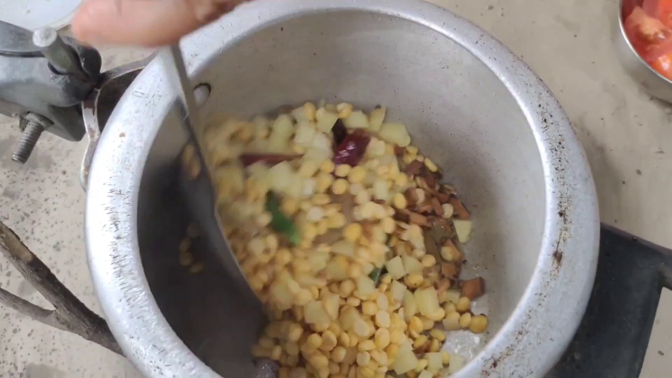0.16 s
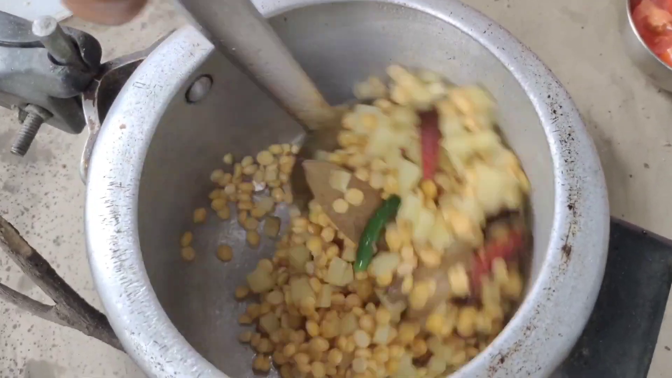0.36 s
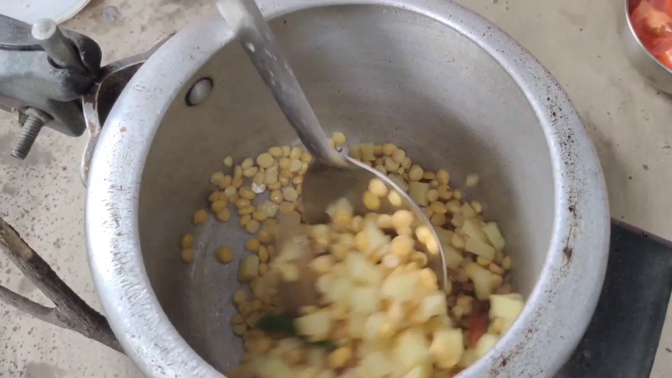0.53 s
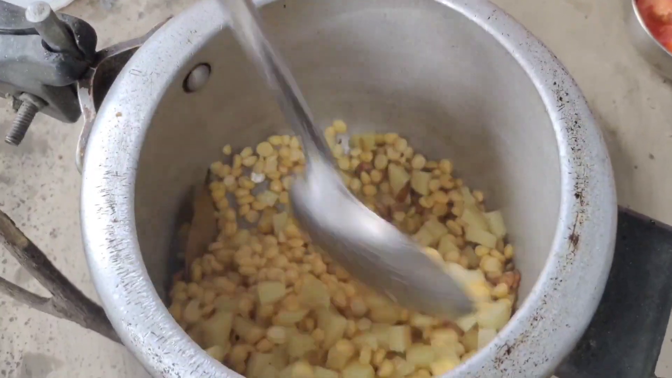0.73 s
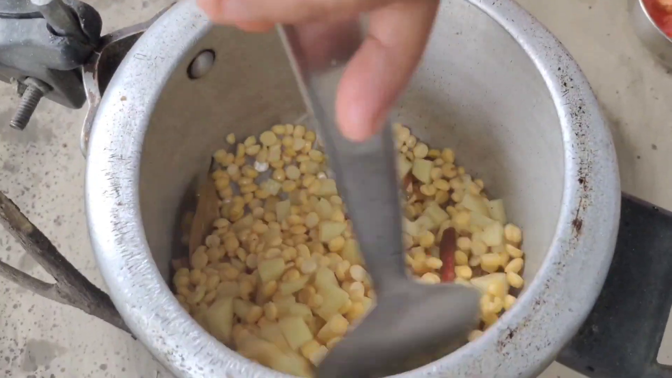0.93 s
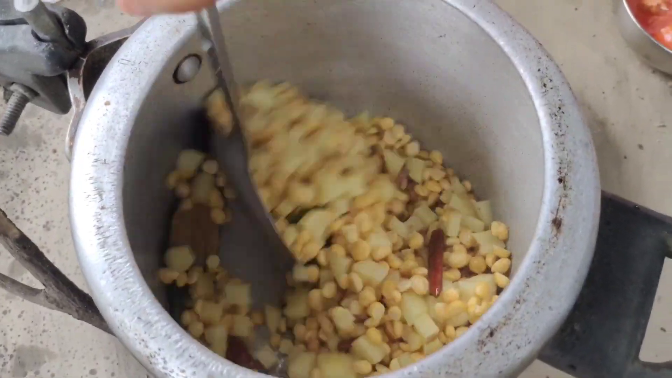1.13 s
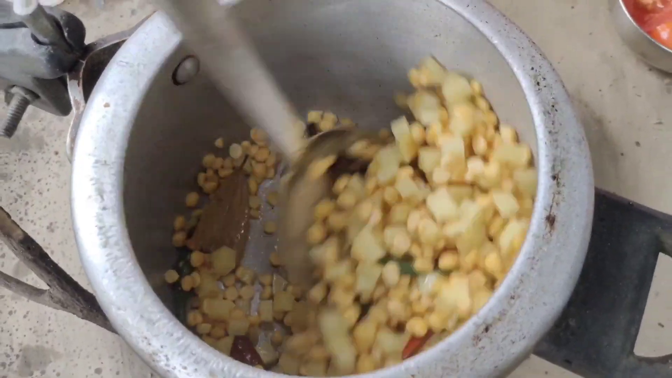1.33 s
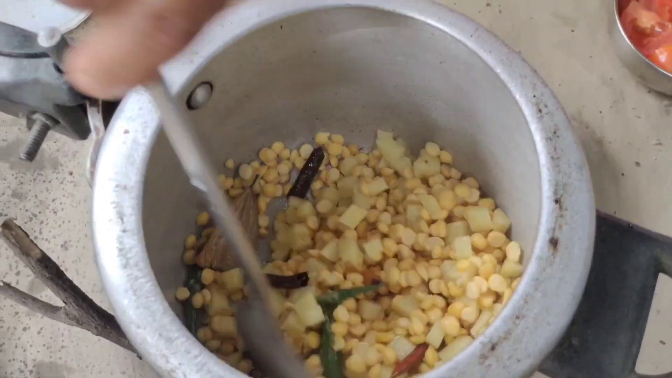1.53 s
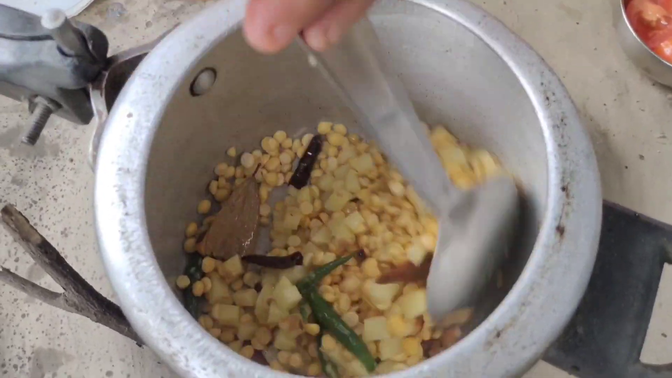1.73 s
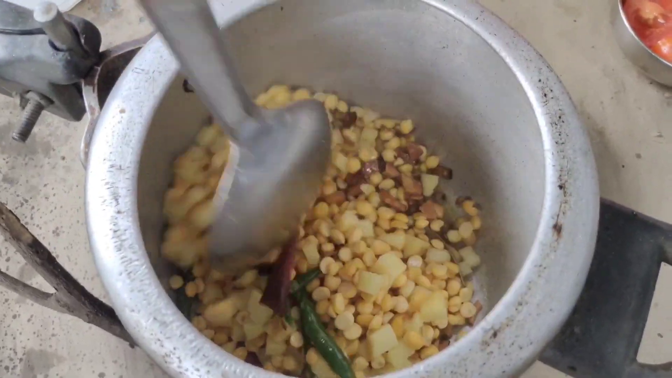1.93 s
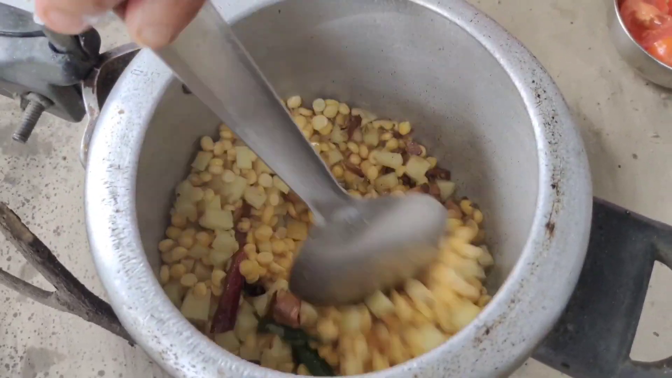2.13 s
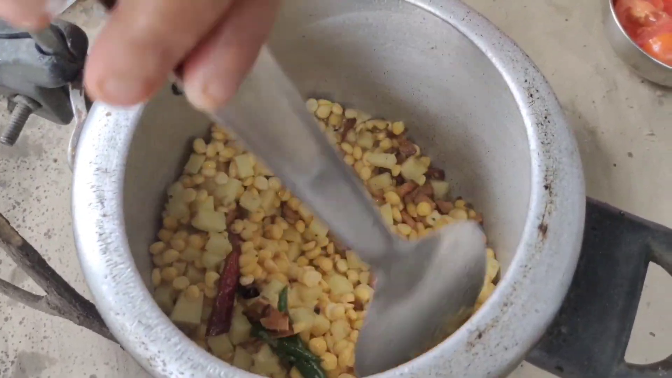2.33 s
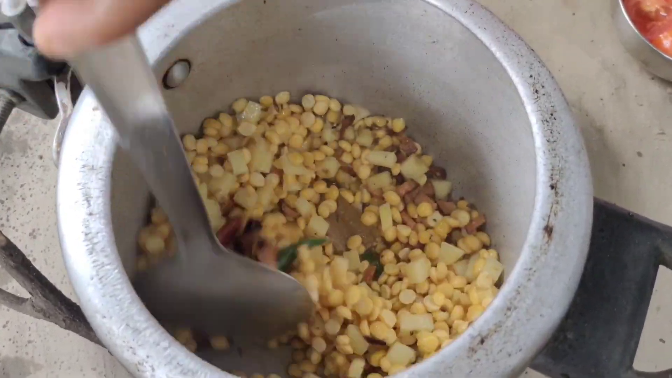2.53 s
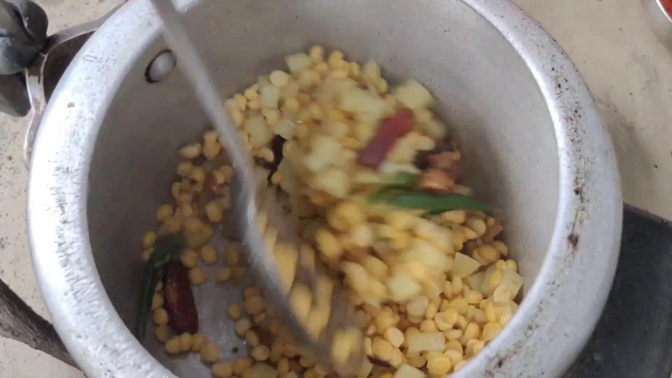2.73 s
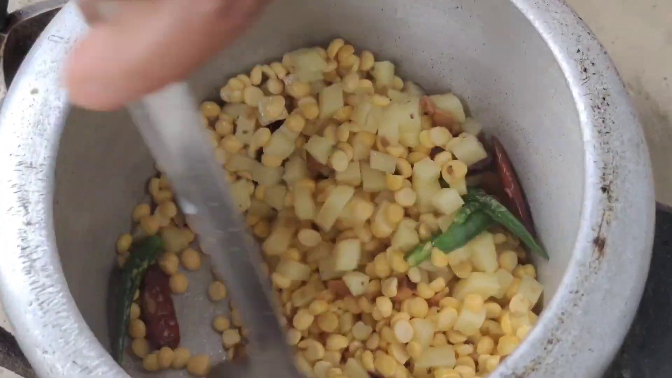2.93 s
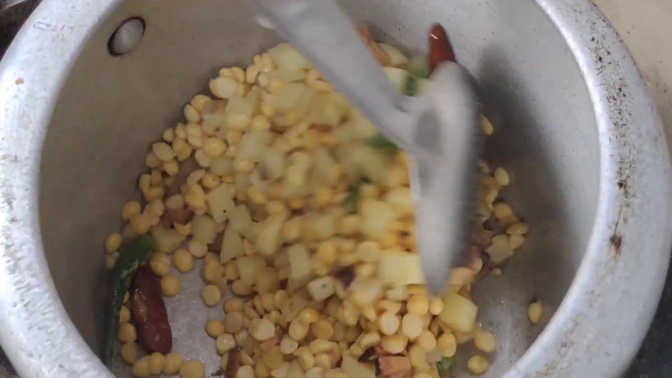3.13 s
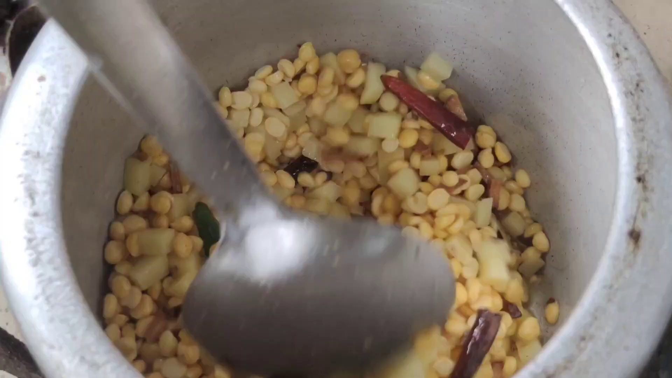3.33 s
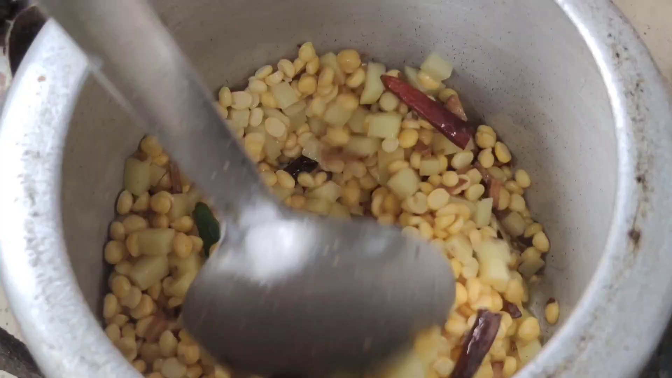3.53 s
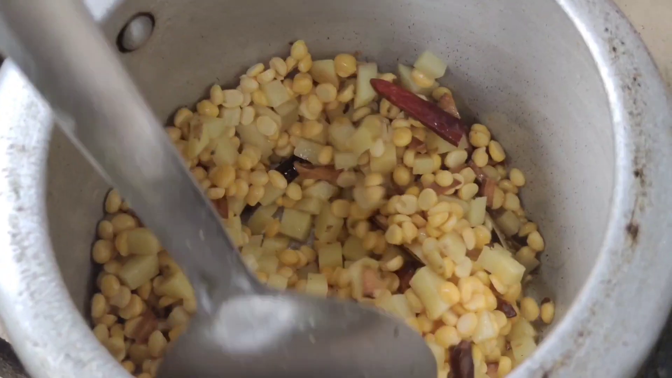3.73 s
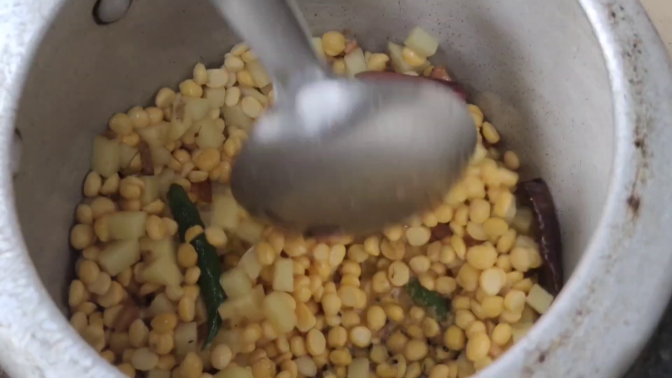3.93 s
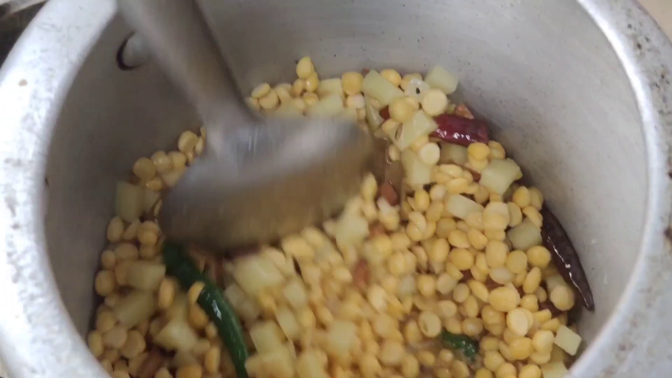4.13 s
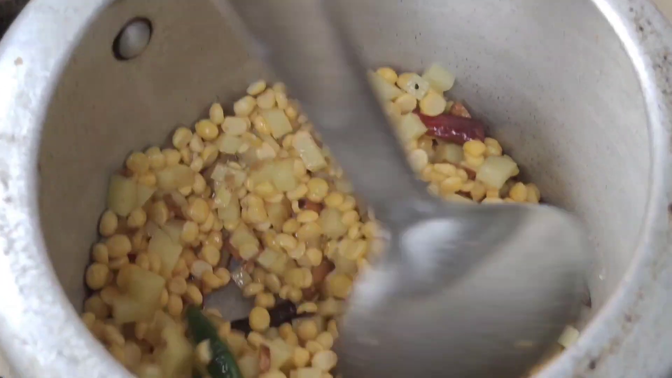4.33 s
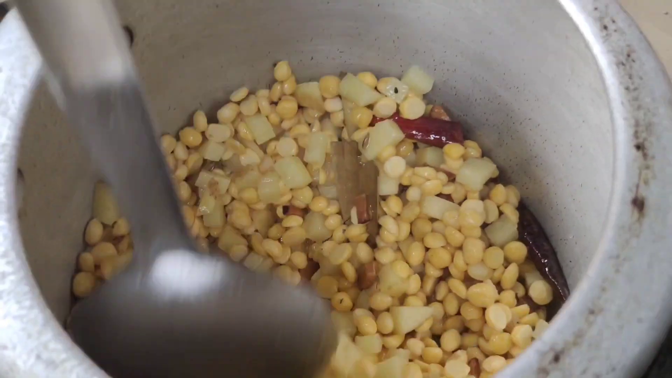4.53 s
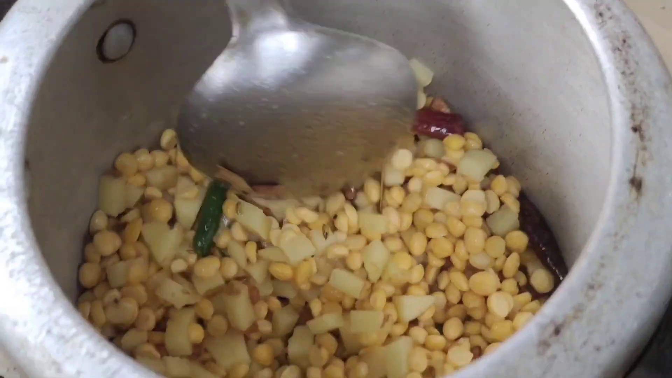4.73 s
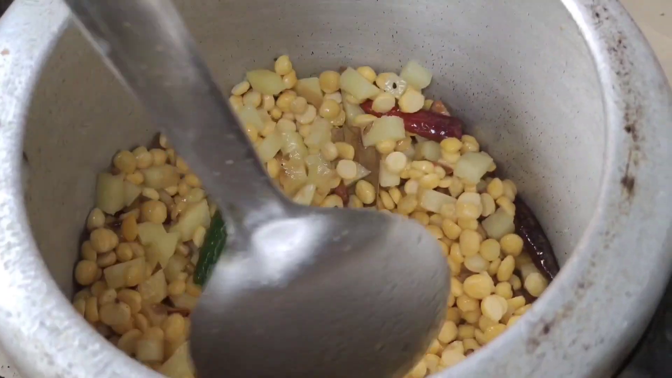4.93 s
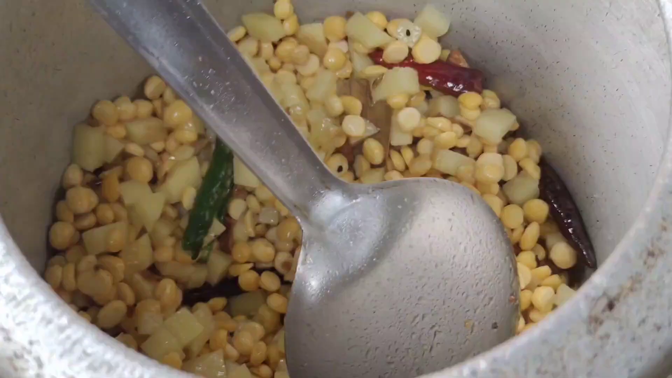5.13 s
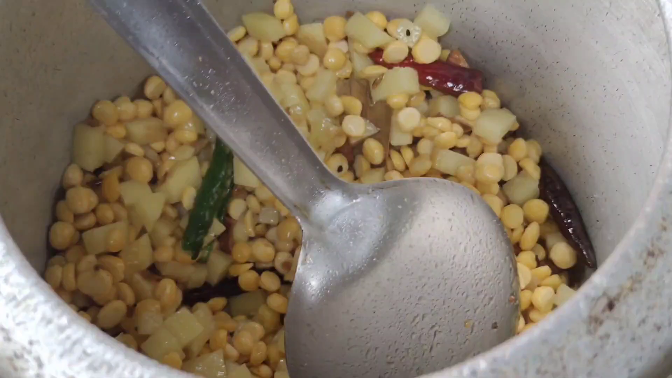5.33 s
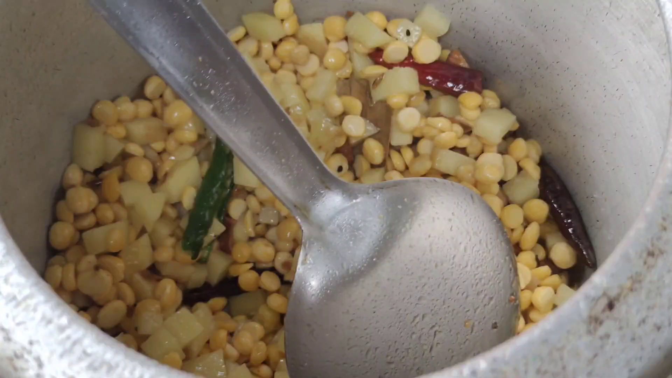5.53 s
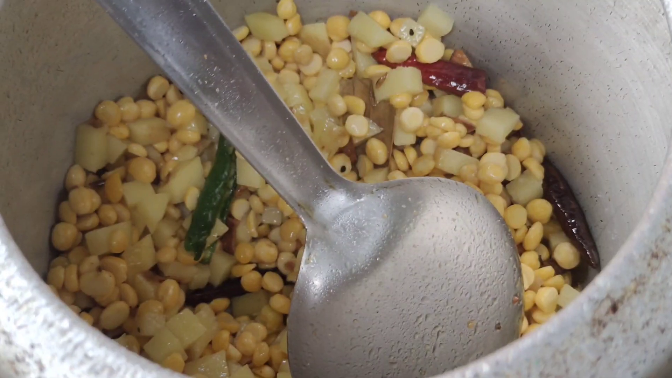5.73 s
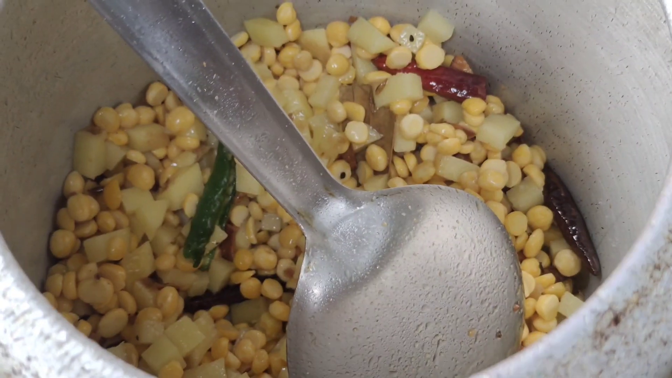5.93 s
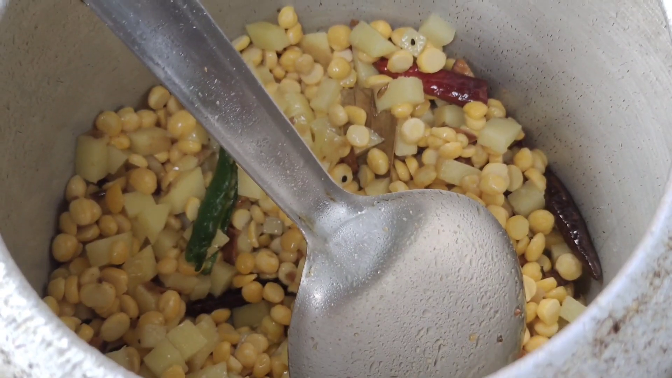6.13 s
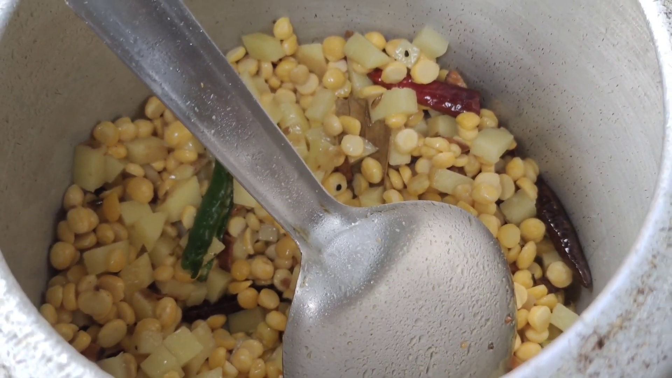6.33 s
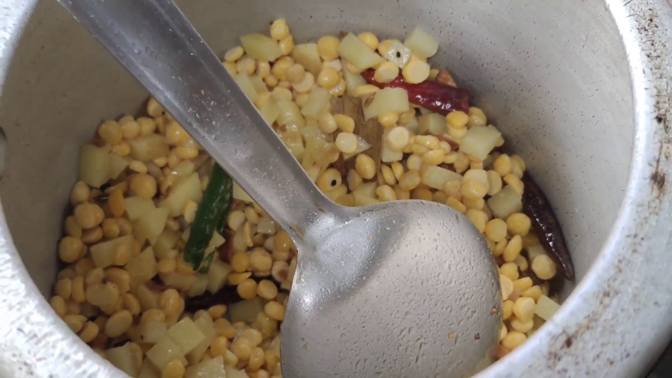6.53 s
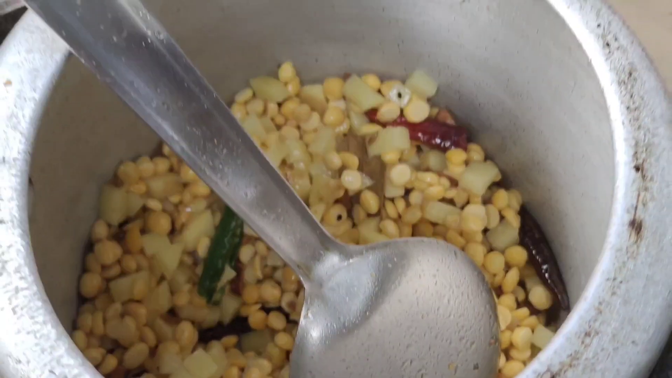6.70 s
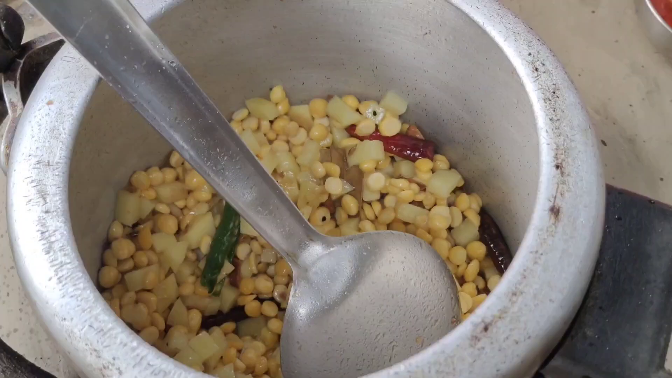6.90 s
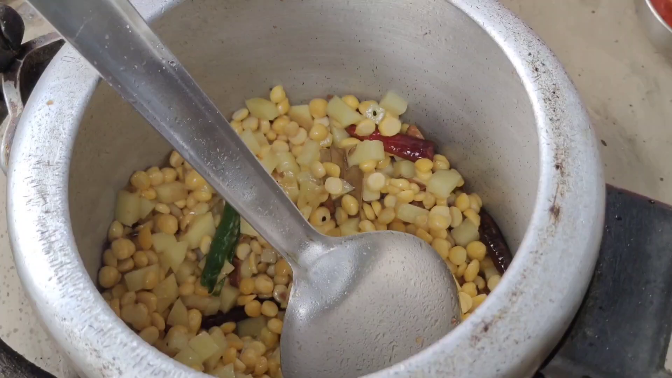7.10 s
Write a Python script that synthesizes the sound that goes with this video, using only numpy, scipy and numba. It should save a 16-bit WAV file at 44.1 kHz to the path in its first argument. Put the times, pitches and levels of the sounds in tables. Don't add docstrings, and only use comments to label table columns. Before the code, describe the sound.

Close stereo pickup over a deep metal pot in a kitchen: dense, crackling oil sizzle runs throughout. A steel ladle turns lentils and potato with irregular clinks, soft hollow thuds and brief scrapes. A faint far drone sags and dies within two seconds over low room rumble. Just after five seconds a last strong clink settles the ladle; the fizz drops, turns thinner and slightly metallic, and slowly fades with a few tiny ticks.

```python
import sys
import numpy as np
from scipy import signal
from scipy.fft import rfft, irfft, next_fast_len
from scipy.io import wavfile
from scipy.ndimage import uniform_filter1d
from numba import njit

SR = 44100
rng = np.random.default_rng(int(sys.argv[2]) if len(sys.argv) > 2 else 0)


def put_to_file(sound):
    columns = np.atleast_2d(sound).T
    safe = np.clip(columns, -1, 1)
    whole_steps = np.round(safe * 32767)
    wavfile.write(sys.argv[1], SR, whole_steps.astype(np.int16))


def boost_factor(decibels):
    exponent = np.asarray(decibels, float) / 20
    return 10 ** exponent


N = 320166
PADDED = next_fast_len(N)
HZ = np.arange(PADDED // 2 + 1) * SR / PADDED + 1e-3
T = np.arange(N) / SR
REST_S = 5.05

REGISTER_EDGES = [5000, 2000, 900]
# (frequency [Hz], density [dB per Hz])
STIRRED_COLOUR = [(150, -35), (250, -20), (325, -21), (484, -0.5), (710, -15.5), (1010, -14.5), (1350, -6),
                  (2200, -2), (2570, -2), (3460, 0.5), (4490, -3.5), (6360, -6), (11000, -9),
                  (12700, -10.5), (13800, -17), (14700, -13), (15500, -14)]
# (frequency [Hz], density [dB per Hz])
RESTING_COLOUR = [(150, -40), (250, -25), (393, -23), (547, -11), (597, -23.5), (748, -21.5), (1160, -17),
                  (1310, -6), (1610, -7), (2240, -5), (2530, -10), (3280, -12.5), (9660, -12.5),
                  (13000, -19), (13800, -18), (14700, -11.5), (15500, -11.5)]
# (time [s], fizz level [dB], added by tumbling food [dB])
STIRRING = [(0.0, -30, 0), (.34, -29.5, -1), (.53, -28, -1.5), (1.0, -31, 1), (1.5, -27.5, -1),
            (1.76, -29, 0), (2.1, -28.5, -2.5), (2.5, -30.5, 1.5), (2.87, -30.5, -1), (3.3, -31, 1),
            (3.7, -30, 0.5), (4.08, -30.5, -3), (4.55, -31.5, -1), (4.95, -31.5, -1.5), (5.1, -32, -3),
            (5.2, -37, 2)]
REGISTER_OVER_FIZZ = [0, -2.5, -7.5, -10.5]
REGISTER_TUMBLE = [0.075, 0.12, 1, 1]
REGISTER_REST = [-43.5, -40.5, -48.5, -52]
REGISTER_COOLING = [2.13, 3.5, 3.3, 3.1]
# (frequency [Hz], width [Hz], level [dB])
LADLE_SONG = [(1320, 45, 9), (2042, 50, 8), (2250, 60, 9), (2330, 50, 8), (2650, 40, 8), (3300, 45, 6),
              (3885, 45, 7), (5030, 55, 3), (5600, 60, 5), (6580, 60, 7), (7300, 70, 6), (8430, 45, 7),
              (8810, 55, 5), (9740, 70, 5)]
# (start [s], length [s], from [Hz], to [Hz], boost [ratio])
CROSS_MODE = [
    (.33, 0.51, 1170, 1150, 1.4),
    (.55, 0.61, 1370, 1350, 1.6),
    (1.202, 0.3, 1190, 1220, 2.4),
    (1.726, 0.19, 1360, 1250, 2.9),
    (1.964, 0.85, 1400, 1367, 1.4),
    (2.75, 0.73, 1323, 1510, 2.6),
    (3.694, 0.41, 1230, 1370, 1.4),
    (4.113, 1., 1290, 1270, 0.34),
]
# (start [s], length [s], frequency [Hz], boost [ratio])
SETTLING_MODES = [(5.15, .72, 3885, 4.5), (6.66, .32, 3885, 4), (5.15, .55, 2650, 2.5),
                  (5.58, .32, 5030, 4), (6.28, .44, 5030, 3), (5.68, .3, 3300, 4), (6.15, .5, 3300, 1.5),
                  (5.7, .5, 8810, 2.5), (5.88, .45, 9740, 3), (5.58, .14, 7200, 3), (6.05, .15, 740, 3),
                  (7.02, .24, 540, 2.5), (5.58, .24, 1320, 3), (6.78, .14, 1300, 2), (4.52, .07, 1340, 4),
                  (6.15, .75, 2230, 2), (5.3, .3, 2250, 2)]
# (start [s], length [s], from [Hz], to [Hz], boost [ratio])
LADLE_HOLLOW = [
    (1.56, 0.51, 2560, 3480, 0.74),
    (4.1, 0.47, 3500, 1960, 0.51),
    (2.08, 1.8, 6300, 6500, 0.73),
    (0.378, 0.335, 1120, 800, 1.03),
]
# (start [s], length [s], cancelled [Hz], depth [0-1])
BASE_SHADES = [
    (1.074, 0.39, 2190, 0.6),
    (1.594, 0.76, 2200, 1),
    (2.7, 0.93, 2210, 0.3),
    (2.897, 0.14, 4350, .8),
    (3.25, .55, 4420, 0.5),
    (3.876, 0.062, 2150, .8),
    (4.716, 0.38, 780, 1),
    (4.7, .3, 950, 1),
]
# (start [s], length [s], frequency [Hz], depth [0-1])
OPPOSED_SPOTS = [(.37, .12, 1750, .9), (.74, .22, 1800, .75), (1.08, .4, 1780, .6), (1.44, 0.3, 1630, .85),
                 (3.8, .12, 1650, .7), (4.0, .53, 1800, .97), (4.57, 0.72, 1860, .97),
                 (4.66, .62, 1730, .92), (4.0, 0.16, 1650, 0.8), (5.5, 2.15, 1760, 0.88),
                 (1.08, .3, 2200, .85), (1.59, .55, 2220, .85), (2.7, .83, 2230, .93),
                 (4.34, .19, 1880, .8)]
# (time [s], level [dB], spot)
WALL_CLICKS = [(0.1308, -9, "slant"), (0.2076, -10.5, "bowl"), (0.2702, -12.5, "bowl"),
               (0.283, -21, "bowl"), (0.55, -22, "bowl"), (0.592, -17, "bowl"), (0.637, -12, "heel"),
               (0.9677, -15.5, "tip"), (0.971, -19, "lip"), (0.98, -24, "lip"), (1.654, -0.5, "belly"),
               (1.663, -21, "belly"), (1.672, -27, "belly"), (2.617, -11.5, "bowl"), (2.679, -22, "slant"),
               (2.9755, -32, "edge"), (2.9872, -7.5, "rim"), (3.494, -18.5, "bowl"), (3.8057, -22, "lip"),
               (3.855, -14.5, "lip"), (4.527, -11.5, "neck"), (4.5373, -13, "bowl"), (4.66, -3.5, "bowl"),
               (4.693, -19, "lip"), (5.28, -3.5, "bowl"), (5.318, -26, "rim"), (5.5955, -26.5, "edge"),
               (5.623, -28, "edge"), (5.7099, -36, "neck"), (6.4816, -47, "edge")]
# (frequency [Hz], t60 [s], group, level [dB])
LADLE_MODES = [(2620, .08, 0, 0), (1324, .05, 0, -25), (2545, .035, 4, 0), (2912, .05, 1, 0),
               (1950, .022, 6, 0), (2770, .03, 1, -5), (3330, .02, 5, -5), (3610, .035, 5, 0),
               (4180, .06, 2, 0), (4340, .04, 2, -3), (4680, .035, 2, -9), (5790, .03, 3, -2),
               (6280, .022, 3, -2), (7000, .03, 3, -4)]
HEAVY_GROUPS = (0, 1, 4)
CONTACT_SPOTS = {"bowl": (-0.5, -26, -27, -16, -31, -27, -52), "rim": (-4, -3.5, -20, -8, 9, 0, -17),
                 "neck": (-14, -22, 0, -4, -18, -12, -14), "slant": (-10, -22, -7, -6, 8.5, -22, -25),
                 "edge": (-23, -10, -4, 0, -16, -14, -27), "belly": (-7, -15, -33, -20, 6, -26, -21),
                 "tip": (-16, -14, -3.5, -5, -20, -11, -8), "lip": (-20, -5, -17, -21, -25, -5, -24),
                 "heel": (-18, -23, -25, -22, -25, -22, 0)}
# (time [s], level [dB], air mode [Hz], blow)
BASE_THUDS = [(0.159, -14.5, 518, "heap"), (0.192, -27, 524, "heap"), (0.288, -17.5, 480, "lump"),
              (0.304, -22, 380, "heap"), (0.588, -28, 524, "steel"), (0.637, -21.5, 495, "steel"),
              (0.658, -27.5, 480, "slump"), (0.968, -27, 444, "lip"), (0.978, -23, 494, "lump"),
              (1.25, -17.5, 550, "slump"), (1.28, -22, 490, "heap"), (1.581, -23, 496, "heap"),
              (1.66, -27, 510, "slump"), (1.819, -35, 470, "slump"), (2.221, -32, 570, "steel"),
              (2.616, -32, 490, "heap"), (2.677, -29.5, 410, "slump"), (2.917, -28.5, 516, "steel"),
              (2.9875, -29, 503, "steel"), (3.075, -11, 482, "lump"), (3.156, -14.5, 496, "lump"),
              (3.217, -27.5, 555, "steel"), (4.528, -31, 487, "lip"), (4.7, -26.5, 487, "lump"),
              (4.93, -31, 483, "lump"), (5.28, -30, 457, "steel"), (5.595, -31, 475, "steel"),
              (5.618, -31, 390, "heap"), (5.642, -31, 504, "lump"), (5.708, -32, 476, "lump"),
              (5.755, -32, 465, "lump"), (5.809, -41, 467, "lump"), (6.1, -43, 730, "lump"),
              (7.1, -48, 540, "lump")]
BLOW_KINDS = {"heap": (-5.5, -13, 0.0054), "lump": (-11.5, -17.5, 0.0073), "steel": (-24, 2.7, 0.0049),
              "lip": (-2, 3.4, 0.0037), "slump": (-2.2, -12, 0.0025)}
BASE_MODES = [264, 345]
KNOCK_MODES = [1265, 1640, 2033]
# (start [s], fade [dB per s], bowl ring [dB], air boom [dB], wall rasp [dB])
DRAGS = [
    (0.129, 250, -30, -34, -32),
    (.153, 250, -47, -41, -44),
    (.262, 150, -32, -31.5, -36),
    (2.604, 148, -36, -38, -28),
    (5.59, 107, -52, -36.5, -37),
    (5.617, 159, -50, -46, -50),
    (5.635, 65, -66, -46.5, -75),
    (5.69, 60, -64, -60, -71),
    (6.475, 148, -52, -64, -41.5),
]
# (time [s], pitch [Hz], level [dB])
FAR_DRONE = [(0, 228, -55), (.12, 233, -52), (.33, 235, -60), (.42, 233, -48), (.56, 234, -56),
             (.75, 228, -62), (.9, 236, -51), (1.05, 238, -51), (1.22, 236, -54), (1.34, 239, -52),
             (1.5, 241, -49), (1.62, 220, -49), (1.72, 190, -56), (1.88, 184, -65), (2.0, 182, -95)]
# (frequency [Hz], density [dB per Hz])
RUMBLE_COLOUR = [(15, -65), (25, -38), (48, -43), (66, -11), (87, -3.5), (141, -2.5), (221, -16),
                 (332, -22), (400, -9.5), (520, -12), (880, -120)]
# (frequency [Hz], likeness [0-1])
PORT_LIKENESS = [(30, 1.7), (150, 0.8), (500, 2.2), (900, 0.5), (1400, 1.33), (1800, 0.34), (2300, 0.56),
                 (3000, 0.56), (5000, -0.28), (16000, 0.38)]
# (frequency [Hz], left leads by [rad])
PORT_LEAD = [(0, 0), (500, -.3), (800, -1), (1300, -1.3), (1550, -2.4), (1800, -2.7), (2330, -5),
             (2600, -6.8), (16000, -30)]
# (frequency [Hz], left minus right [dB])
PORT_TILT = [(60, 4), (110, -3.5), (200, 6.5), (380, -6.5), (700, -1.5), (1290, 0), (2380, 0.5),
             (4400, -0.5), (8120, -1.5), (15000, -3)]


def unit(x):
    return x / np.sqrt(np.mean(np.mean(np.atleast_2d(x), axis=0) ** 2))


def over_hz(table):
    hz, value = np.array(table).T
    return np.interp(np.log(HZ), np.log(hz), value)


def shape(x, gain):
    return irfft(rfft(x, PADDED) * gain, PADDED)[..., :N]


def bell(hz, width):
    return 1 / np.sqrt(1 + ((HZ - hz ** 2 / HZ) / width) ** 2)


def walk(rate):
    k = int(SR / rate)
    held = np.repeat(rng.standard_normal(N // k + 1), k)
    return 1.15 * uniform_filter1d(uniform_filter1d(held, k), k)[:N]


def pops(rate, spread_db):
    size = boost_factor(spread_db * np.minimum(rng.exponential(size=N), 3.5))
    return (rng.random(N) < rate / SR) * rng.standard_normal(N) * size


def ring(out_len, hz, t60, phase, push):
    t = np.arange(out_len) / SR
    swell, decay = 1 - np.exp(-t / push), np.exp(-np.log(1000) * t / t60)
    return np.sin(2 * np.pi * hz * t + phase) * swell * decay


def add(out, s, x):
    i = int(s * SR)
    out[i:i + len(x)] += x[:N - i]


@njit
def notch(x, hz, width, depth):
    y, band, low = np.empty(len(x)), 0., 0.
    for i in range(len(x)):
        g, k = np.tan(np.pi * hz[i] / SR), width / hz[i]
        v = (band + g * (x[i] - low)) / (1 + g * (g + k))
        y[i] = x[i] - depth[i] * k * v
        band, low = 2 * v - band, low + 2 * g * v
    return y


def ports(x, scatter_s=.31):
    other = np.exp(-2j * np.pi * HZ * scatter_s)
    alike = np.clip(over_hz(PORT_LIKENESS), 0, 1)
    late = np.exp(1j * np.interp(HZ, *np.transpose(PORT_LEAD)))
    tilt = boost_factor(over_hz(PORT_TILT) / 2)
    top = 1 / (1 + (HZ / 15640) ** 200)
    left = top * tilt * (alike * late + np.sqrt(1 - alike ** 2) * other)
    return np.array([shape(x, left), shape(x, top / tilt)])


def frying():
    rested = np.clip((T - REST_S) / 0.19, 0, 1)
    bursts = bubbles(rested)
    s, fizz_db, tumble_db = np.transpose(STIRRING)
    above = [0] + [1 / (1 + (edge / HZ) ** 12) for edge in REGISTER_EDGES] + [1]
    out, surge = 0, walk(14)
    for k in range(4):
        band = above[k + 1] - above[k]
        stirred = unit(shape(bursts, band * boost_factor(over_hz(STIRRED_COLOUR))))
        resting = shape(bursts, band * boost_factor(over_hz(RESTING_COLOUR)))
        resting = resting / np.std(np.mean(resting, axis=0)[rested == 1])
        spit_db = 0.061 * surge + 0.5 * walk(26)
        stirred_db = np.interp(T, s, fizz_db + REGISTER_OVER_FIZZ[k] + REGISTER_TUMBLE[k] * tumble_db)
        resting_db = REGISTER_REST[k] - REGISTER_COOLING[k] * np.maximum(T - REST_S, 0)
        mix = (1 - rested) * boost_factor(stirred_db) * stirred + rested * boost_factor(resting_db) * resting
        out = out + boost_factor(spit_db) * mix
    return out


def bubbles(rested):
    x = unit(pops(9000, spread_db=1.56)) + 0.75 * rng.standard_normal(N)
    for hz in np.geomspace(2500, 15000, num=18):
        drift_hz = hz * (1 + 0.054 * walk(1.51))
        swarm_db = (2.5 + 0.46 * rested) * walk(19)
        x = notch(x, drift_hz, hz / 8, 1 - boost_factor(swarm_db))
    x = sing(x, np.maximum(rested, 0.051))
    x = moves([x], CROSS_MODE + SETTLING_MODES, 50.0, sign=-0.68)[0]
    pair = moves(ports(x), LADLE_HOLLOW, 195.0, sign=-1.36)
    left, right = moves(pair, BASE_SHADES, 190.0, sign=0.55)
    centre = moves([(left + right) / 2], OPPOSED_SPOTS, 256.0, sign=1)
    return centre + np.array([left - right, right - left]) / 2


def sing(x, held):
    cooling = np.clip(1 - 0.35 * (T - REST_S), 0, 1)
    for hz, width, db in LADLE_SONG:
        lift_db = cooling * db + 6.5 * np.tanh(walk(18))
        x = notch(x, np.full(N, 1. * hz), 1. * width, held * (1 - boost_factor(lift_db)))
    return x


def moves(x, rows, width, sign):
    move_s = 0.045
    for s, length, hz, *end_hz, depth in rows:
        held = np.clip(np.minimum(T - s, s + length - T) / move_s, 0, 1)
        last_hz = (end_hz or [hz])[0]
        glide = np.interp(T, [s, s + length], [hz, last_hz]) * (1 + 0.0066 * walk(6.1))
        if sign > 0:
            depth = min(depth, 1)
        x = np.array([notch(port, glide, width, sign * held * depth) for port in x])
    return x


def clicks():
    out, size = np.zeros(N), 6000
    bowl_swell_s, tick_swell_s, crack_fade_s = 0.0019, 0.0004, 0.0026
    for s, db, spot in WALL_CLICKS:
        group_db = CONTACT_SPOTS[spot]
        x = np.zeros(size)
        for hz, t60, group, mode_db in LADLE_MODES:
            detune, phase = rng.random(2)
            mode_hz = hz * (1 + 0.014 * (detune - .5))
            swell_s = bowl_swell_s if group in HEAVY_GROUPS else tick_swell_s
            x += boost_factor(group_db[group] + mode_db) * ring(size, mode_hz, t60, np.pi / 2 * phase, push=swell_s)
        crack_db = np.clip(group_db[2], -17, -10) + 6.5
        crack = boost_factor(crack_db) * rng.standard_normal(size) * np.exp(-np.arange(size) / SR / crack_fade_s)
        crack = uniform_filter1d(crack, size=3) - uniform_filter1d(crack, size=15)
        add(out, s, boost_factor(db) * (x + crack))
    return ports(out, scatter_s=0.001021) * boost_factor([[2.0], [-2.0]])


def thuds():
    out, size = np.zeros(N), 8000
    air_t60_s, cut_hz = 0.049, 150
    for s, db, hz, blow in BASE_THUDS:
        base_db, knock_db, swell_s = BLOW_KINDS[blow]
        air = ring(size, hz, air_t60_s, 0, push=0.0013)
        base = sum(ring(size, f, 1.37 * air_t60_s, 0, push=swell_s) for f in BASE_MODES)
        knock = 0
        for f in KNOCK_MODES:
            knock = knock + ring(size, f * (1 + 0.029 * rng.standard_normal()), 0.043, 0, push=0.00039)
        add(out, s, boost_factor(db) * (air + boost_factor(base_db + 2.5) * base + boost_factor(knock_db + 3.5) * knock))
    return ports(shape(out, 1 / (1 + (cut_hz / HZ) ** 4)), scatter_s=0.00202)


def scrapes():
    grip_s = 0.0063
    slips = pops(3500, spread_db=0.5) * boost_factor(1.4 * walk(60))
    bowl = bell(2550, 90) + .5 * bell(3040, 120)
    air = bell(490, 123) ** 2 + 0.58 * bell(305, 160) ** 2 + 0.75 * bell(1293, 55) ** 2
    wall = bell(5500, 10600) ** 3
    sung = sing(slips, np.ones(N))
    layers = [unit(ports(shape(x, body))) for x, body in ((slips, bowl), (slips, air), (sung, wall))]
    out = 0
    for s, fade_db, *levels in DRAGS:
        drag = np.clip((T - s) / grip_s, 0, 1) * boost_factor(-fade_db * np.maximum(T - s - grip_s, 0))
        out = out + drag * sum(boost_factor(db) * x for db, x in zip(levels, layers))
    return out


def kitchen():
    rumble = unit(ports(shape(rng.standard_normal(N), boost_factor(over_hz(RUMBLE_COLOUR)))))
    rumble = rumble * boost_factor(-62.5 + 0.22 * walk(4.1))
    s, hz, db = np.transpose(FAR_DRONE)
    pitch_hz = np.interp(T, s, hz) * (1 + .035 * walk(40.))
    drone = np.sin(2 * np.pi * np.cumsum(pitch_hz) / SR)
    flutter_db = 3.5 * walk(30.)
    return rumble + ports(np.sqrt(2) * drone * boost_factor(np.interp(T, s, db) + flutter_db))


def scene():
    return frying() + clicks() + thuds() + scrapes() + kitchen()


def low_pass(x):
    return signal.sosfilt(signal.butter(12, 15750, fs=SR, output="sos"), x)


def record(dry):
    return low_pass(dry)


dry = scene()
out = record(dry)
put_to_file(out)
```